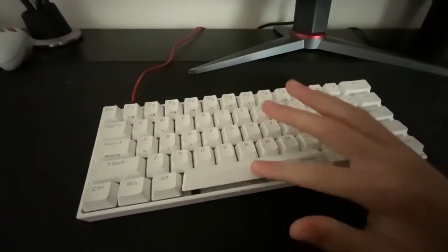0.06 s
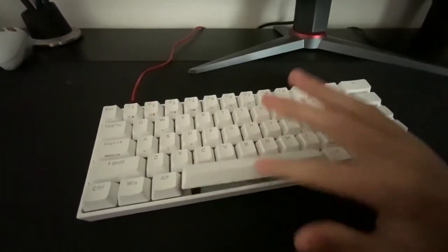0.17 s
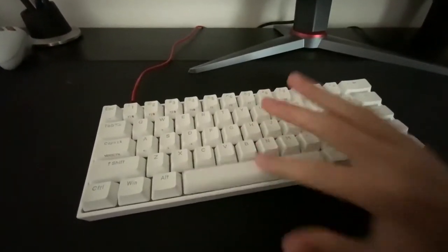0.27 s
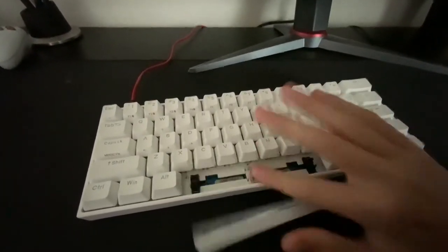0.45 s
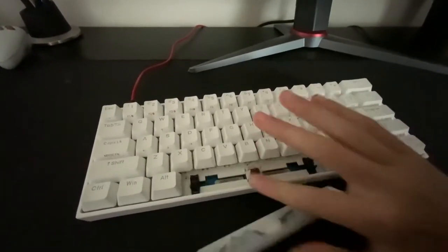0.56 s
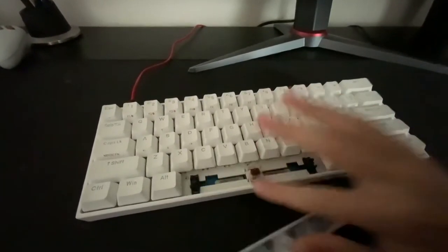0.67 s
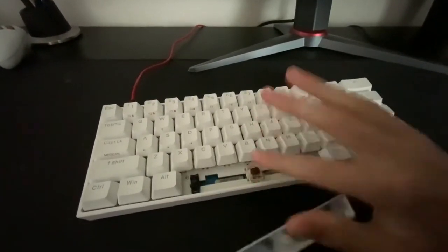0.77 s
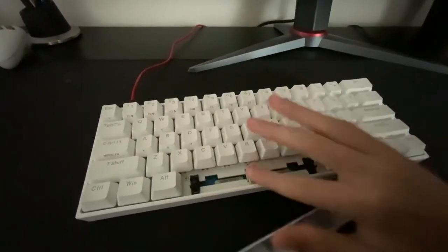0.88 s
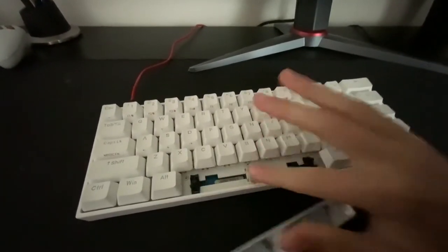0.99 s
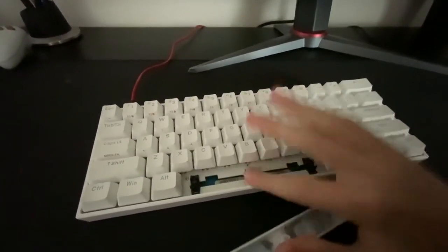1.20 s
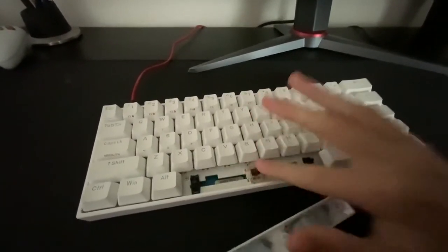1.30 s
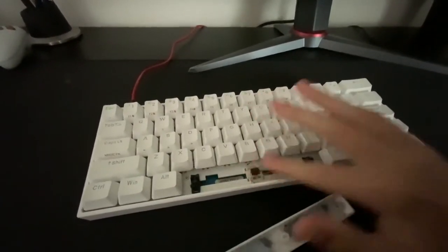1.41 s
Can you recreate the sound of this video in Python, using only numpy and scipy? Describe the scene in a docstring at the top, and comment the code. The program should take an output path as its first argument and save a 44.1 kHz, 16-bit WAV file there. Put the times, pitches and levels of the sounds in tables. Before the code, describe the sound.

A plastic space bar rattles and clatters off a keyboard, then the bare switch clicks.

```python
"""A plastic rattle: a space bar is worked loose on its stems, pops off and clatters on the desk.
Each contact is a brief cluster of plastic modes; the hollow bar rings, the desk knocks and hums.
A finger then taps the bare switch, which clicks going down and up, ringing its stem and the
mechanical keyboard's case. The desk thumps softly throughout. A small, quiet room."""
import sys
import numpy as np
from scipy import signal
from scipy.fft import rfft, irfft
from scipy.io import wavfile
from scipy.ndimage import uniform_filter1d

SR = 44100
rng = np.random.default_rng(int(sys.argv[2]) if len(sys.argv) > 2 else 0)


def transcribe(u):
    """Save the signal u as a 16-bit wav file named by the first command-line argument.

    u: samples, shape (n,) or (channels, n), limited to [-1, 1]; the rate is SR.
    q: integer samples, one column per channel.
    """
    v = np.clip(np.atleast_2d(u).T, -1, 1)
    q = np.round(v * 32767).astype(np.int16)
    wavfile.write(sys.argv[1], SR, q)


N = 63945
T = np.arange(N) / SR
HZ = np.maximum(np.fft.rfftfreq(2 * N, 1 / SR), 1)


def from_db(db):
    """Decibels to gain."""
    return 10 ** (np.asarray(db) / 20)


def at_hz(points, hz):
    """Read a table on a log-frequency axis."""
    f, value = np.transpose(points)
    return np.interp(np.log(hz), np.log(f), value)


def decay(t, t60):
    """Exponential fall, 60 dB in t60 seconds."""
    return np.exp(-np.log(1000) * t / t60)


def add(out, s, sound):
    """Mix a sound in at time s."""
    i = max(int(s * SR), 0)
    out[..., i:i + sound.shape[-1]] += sound[..., :N - i]


def pan(x, pan_db):
    """Set left pan_db above right."""
    return x * from_db([[pan_db / 2], [-pan_db / 2]])


def causal(gain):
    """Minimum-phase response with the given gains."""
    cepstrum = irfft(np.log(gain + 1e-9))
    half = cepstrum.shape[-1] // 2
    fold = np.r_[1, np.full(half - 1, 2), 1, np.zeros(half - 1)]
    return np.exp(rfft(cepstrum * fold))


def ring(x, modes):
    """Damped resonators in parallel, driven by x."""
    out = 0
    for hz, db, t60 in modes:
        r, w = decay(1 / SR, t60), 2 * np.pi * hz / SR
        poles = [1, -2 * r * np.cos(w), r * r]
        out = out + signal.lfilter([0, from_db(db) * np.sin(w)], poles, x + 1e-18)
    return out


def struck(blows, modes, vary_db, detune, rise_cycles=1.36, size=8192):
    """Each blow (time [s], level [dB]) rings every mode with its own strength and tuning."""
    out, t = np.zeros(N), T[:size]
    for s, db in blows:
        for hz, mode_db, t60 in modes:
            strength, tuning, phase = rng.standard_normal(3)
            envelope = (1 - np.exp(-t * hz / rise_cycles)) * decay(t, t60)
            tone = np.sin(2 * np.pi * (hz * (1 + detune * tuning) * t + phase))
            add(out, s, from_db(db + mode_db + vary_db * strength) * envelope * tone)
    return out


def contacts(rows, colour, spread, attack_s, peak_db, peak_width, size=4096):
    """Each contact sets off a dense cluster of plastic modes that dies in milliseconds."""
    bass_hz, treble_hz, mono_below_hz = 1070, 4940, 97
    bend_lag_s, bend_hz = 0.001411, 2002  # slow bending waves: lows arrive late
    out, t = np.zeros((2, N)), T[:size]
    hz = np.maximum(np.fft.rfftfreq(size, 1 / SR), 1)
    body = from_db(at_hz(colour, hz))
    body /= np.sqrt(np.mean(body ** 2))
    late_lows = np.exp(-2j * np.pi * bend_lag_s * bend_hz * np.arctan(hz / bend_hz))
    for s, db, bass_db, treble_db, t60, *peaks in rows:
        envelope = (1 - np.exp(-t / attack_s)) * decay(t, t60)
        mid, side = rfft(rng.standard_normal((2, size)) * envelope)
        burst = mid + spread * side * [[1], [-1]] / (1 + (mono_below_hz / hz) ** 2)
        local_rms = np.sqrt(uniform_filter1d(abs(burst) ** 2, size=44))
        shape_db = bass_db / (1 + (hz / bass_hz) ** 4) + treble_db / (1 + (treble_hz / hz) ** 4)
        for peak_hz in peaks:
            shape_db += peak_db * np.exp(-(np.log(hz / peak_hz) / peak_width) ** 2)
        contact = irfft(burst * late_lows * causal(body * from_db(shape_db) / local_rms))
        add(out, s, from_db(db) * np.sqrt(SR / 100) * contact)  # level referred to 10 ms
    return out


# Left-right likeness of diffuse sound: (frequency [Hz], coherence [0-1])
COHERENCE = [(120, 1), (300, 1), (600, 0), (1500, 0), (4000, 0), (12000, 1)]


def diffuse(colour):
    """Coloured stereo noise, rms 1; the sides are alike in the bass and at the top, apart between."""
    mid, side = rfft(rng.standard_normal((2, 2 * N))) * from_db(at_hz(colour, HZ))
    alike = at_hz(COHERENCE, HZ)
    x = irfft(np.sqrt(1 + alike) * mid + np.sqrt(1 - alike) * side * [[1], [-1]])[:, :N]
    return x / x.std()


# Background spectrum: (frequency [Hz], relative density [dB])
ROOM_TONE_COLOUR = [(25, -33), (50, -1), (80, 3), (120, -3.5), (175, -9.5), (235, -5.5), (285, -1.5),
                    (335, -12.5), (450, -5.5), (560, -12), (700, -22), (1300, -18), (2500, -30),
                    (4500, -39.5), (8000, -36), (10000, -52.5), (12500, -43.5), (16000, -55)]


def room_tone(level_db=-48):
    """Steady, low background noise."""
    return from_db(level_db) * diffuse(ROOM_TONE_COLOUR)


# Reflection spectrum: (frequency [Hz], relative gain [dB])
REVERB_COLOUR = [(60, -11.5), (140, 18.5), (300, -3), (600, 6), (1500, 4.5), (4000, 3), (8000, -1.5),
                 (10000, -13), (12500, -0.5), (15000, -4)]


def reverb(x, build_s=0.002):
    """Quick reflections from desk, screen and wall, then a longer tail."""
    response = 0
    for db, t60_s in ((-15.5, 0.099), (-17, 0.39)):
        fade = (1 - np.exp(-(T / build_s) ** 2)) * decay(T, t60_s)
        fade /= np.sqrt(np.sum(fade ** 2))
        response = response + from_db(db) * diffuse(REVERB_COLOUR) * fade
    return signal.fftconvolve(x, response, axes=1)[:, :N]


# Desk thumps: (time [s], level [dB], frequency [Hz], swell [s])
THUMPS = [(0.033, -39.5, 76.6, 0.023), (.231, -27.5, 74.7, 0.013), (.406, -18, 63.4, 0.0073),
          (.468, -37, 60.6, 0.02), (.673, -32, 76.2, 0.013), (.851, -31.5, 84.2, 0.0072),
          (1.019, -34.5, 92.6, 0.0089), (1.186, -41.5, 79, .02), (1.343, -47.5, 81.7, 0.017)]


def desk_thumps():
    """Each press rocks the desk for a few slow cycles."""
    out = np.zeros(N)
    for s, db, hz, swell_s in THUMPS:
        envelope = (T / swell_s * np.exp(1 - T / swell_s)) ** 2
        add(out, s, -from_db(db) * envelope * np.sin(2 * np.pi * hz * T))
    return out


# Bar ends hitting the desk: (time [s], level [dB], band centre [Hz])
KNOCKS = [(0.39, 3, 1490), (0.392, 6, 647)]
# Desk top, short modes and low hum: (frequency [Hz], gain [dB], t60 [s])
DESK_MODES = [(560, -14.5, 0.047), (649, -16, 0.032), (910, -27, 0.0066), (1010, -8, 0.011),
              (1470, -5.5, 0.0077), (1820, -23, 0.013)]
DESK_HUM_MODES = [(122.4, -39, 1), (205.8, -36, 0.39), (292.6, -34.5, 0.25), (381, -34, 0.31),
                  (430, -21.5, 0.061), (463, -37, .28)]


def desk_knock(band_ratio=1.38, low_cut_hz=410, landing_s=0.411):
    """The falling bar strikes the desk twice, bright then hollow, and leaves it humming as it lands."""
    force, landing = np.zeros((2, N))
    for s, db, hz in KNOCKS:
        band = signal.butter(2, [hz / band_ratio, hz * band_ratio], "band", fs=SR, output="sos")
        add(force, s, from_db(db) * signal.sosfilt(band, signal.unit_impulse(N)))
    low_cut = signal.butter(3, low_cut_hz, "high", fs=SR, output="sos")
    knock = signal.sosfilt(low_cut, ring(force, DESK_MODES))
    add(landing, landing_s, np.ones(1))
    return pan(knock, pan_db=0.5) - ring(landing, DESK_HUM_MODES)


# Light taps: (time [s], level [dB], bass [dB], treble [dB], t60 [s], resonance [Hz])
TAPS = [(.5945, -49, 5, -20, 0.011, 1000), (.6525, -53.5, -3, 2.5, 0.0081, 1620),
        (.6595, -47, 4, -12, 0.0069, 1550), (.671, -46, 3, -14, 0.029, 3670),
        (.988, -39.5, -22, -24, 0.043, 3350), (1.1595, -40.5, -22, 6, 0.028, 3320),
        (1.169, -53.5, -4, 5, .019, 2330), (1.332, -39.5, -44, -11, .022, 2500),
        (1.371, -44, 5.5, -4, .04, 1660)]
# Tap spectrum: (frequency [Hz], relative density [dB])
TAP_COLOUR = [(200, -39), (600, -26), (900, 2.5), (1300, 9.5), (1750, 1), (2500, 3.5), (3400, -5),
              (4500, -5), (7000, -8), (12500, -29), (16000, -21)]


def light_taps():
    """Fingers and loose plastic touch lightly."""
    taps = contacts(TAPS, TAP_COLOUR, spread=0.8, attack_s=0.00035, peak_db=8, peak_width=0.15)
    return pan(taps, pan_db=0.8)


# Switch clicks: (time [s], level [dB], bass [dB], treble [dB], t60 [s], resonance 1 [Hz],
# resonance 2 [Hz], case ring [dB], stem ring [dB])
CLICKS = [(0.7251, -39.5, 10, -14, 0.04, 3370, 1300, -42, -55.5),
          (0.8363, -27.5, -1, 2, 0.0085, 8040, 2840, -35, -41.5),
          (.9130, -19.5, 1, -1, 0.0078, 11750, 4650, -37, -25),
          (1.009, -40.5, 10.5, 6.5, 0.0059, 7050, 8650, -48, -51),
          (1.0885, -30, -10, -3, 0.01, 6070, 8900, -42.5, -49),
          (1.2452, -32, -16, 1.5, 0.014, 6450, 3000, -43.5, -56),
          (1.327, -46.5, -13, 1.5, .011, 7800, 3030, -70, -47),
          (1.3896, -43.5, 8, -3, 0.0036, 5000, 3970, -45.5, -52.5)]
# Click spectrum: (frequency [Hz], relative density [dB])
CLICK_COLOUR = [(200, -20), (600, -15), (900, -9.5), (1400, -5), (1850, 2), (2700, 1), (3200, -2),
                (3750, 1), (5300, -0.5), (7100, 3), (8200, 5), (9200, -9), (11600, -4.5), (13500, 0),
                (16000, -13)]
# Modes of the case, and of the stem and spring: (frequency [Hz], gain [dB], t60 [s])
CASE_MODES = [(487, -24, 0.027), (619, -3.5, 0.079), (899, -3, 0.074), (1147, -4.5, 0.081)]
STEM_MODES = [(1720, 6, 0.02), (2115, 5, 0.039), (2630, 8, 0.013), (2970, 4, 0.021), (3615, 8.5, 0.016),
              (4390, -4.5, .055), (4600, 1.5, 0.022), (6140, -3, 0.02)]


def switch():
    """The bare switch snaps, ringing the case and the stem differently each time."""
    clicks = contacts([row[:-2] for row in CLICKS], CLICK_COLOUR,
                      spread=0.37, attack_s=0.00038, peak_db=6.5, peak_width=0.08)
    case_blows = [(s, case_db) for s, *_, case_db, stem_db in CLICKS]
    stem_blows = [(s, stem_db) for s, *_, stem_db in CLICKS]
    case = struck(case_blows, CASE_MODES, vary_db=3, detune=0.031)
    stem = struck(stem_blows, STEM_MODES, vary_db=3.3, detune=0.0037)
    return pan(clicks + case + stem, pan_db=0.8)


# Scrape envelope: (time [s], level [dB])
SCRAPE_LEVEL = [(0, -60.5), (.14, -51), (.18, -44), (.225, -45), (.27, -43), (.31, -42), (.37, -62),
                (.378, -31.5), (.385, -61), (.4, -80.5)]
# Bar-on-stem spectrum, scrape and rattle: (frequency [Hz], relative density [dB])
RATTLE_COLOUR = [(150, -43), (380, -12.5), (630, 2.5), (880, -9), (1230, 0), (2000, -2), (2850, -2.5),
                 (4000, -11), (6000, -15.5), (8000, -13.5), (10000, -26), (12500, -21), (16000, -36)]


def scrape(slips_per_s=960):
    """Tiny slips of plastic on plastic between the rattles."""
    slips = (rng.random(N) < slips_per_s / SR) * rng.standard_normal(N)
    response = causal(from_db(at_hz(RATTLE_COLOUR, HZ)))
    friction = irfft(rfft(slips, 2 * N) * response)[:N]
    level_db = np.interp(T, *np.transpose(SCRAPE_LEVEL))
    return friction / friction.std() * from_db(level_db)


# Bar contacts, on the stems then on the desk:
# (time [s], level [dB], bass [dB], treble [dB], t60 [s], resonance 1 [Hz], resonance 2 [Hz])
RATTLES = [(.0205, -39.5, 0, 2.5, 0.023, 2800, 1310), (.0325, -42.5, 9, -5, 0.015, 1290, 2000),
           (.077, -37, 4, -2, .075, 1300, 2840), (.122, -39, -4, 7, 0.0097, 3480, 2120),
           (.1555, -44.5, 5, 17.5, 0.025, 4550, 3340), (.164, -37.5, 2, 7, 0.023, 1220, 3300),
           (.174, -39, 3, -5, 0.0093, 1174, 4300), (.1875, -34, -3.5, 5, 0.013, 3300, 7540),
           (.1925, -31, 1.5, 10.5, 0.016, 733, 2750), (.2095, -32, 2.5, 13, 0.043, 3270, 7200),
           (.2205, -31.5, 5, 12, 0.017, 1310, 3050), (.246, -27, -10.5, -18, 0.0091, 1260, 2940),
           (.2505, -30, -1, 1, 0.0068, 1230, 3530), (.2612, -19, -5.5, 3, 0.012, 2760, 1730),
           (.269, -33.5, -6.5, -22.5, .025, 2450, 854), (.285, -33, 6.5, 10.5, 0.036, 641, 6230),
           (.2935, -42.5, 2, 13, .014, 1706, 610), (.2972, -26, -4.5, 8.5, 0.011, 2150, 4600),
           (.315, -33, -18, -7, 0.025, 3360, 4440), (.337, -37, -4.5, -4.5, .02, 1730, 3360)]
CLATTER = [(.3815, -27, -4.5, 8.5, .012, 3100, 11850), (.3905, -25, -1, -18, 0.0037, 3530, 4200),
           (.4059, -19.5, -12, 5.5, 0.0084, 5990, 3470), (.4078, -24, 7, 1, 0.02, 4400, 3510),
           (.411, -27, 5, -1, 0.026, 3390, 246), (.419, -25, -13, -26.5, 0.065, 3500, 2280),
           (.429, -37, 4, 1.5, 0.06, 430, 5340), (.4482, -33, 12, -14.5, 0.072, 1400, 638),
           (.458, -40, 10.5, 7.5, 0.047, 630, 3470), (.532, -50.5, -6, -4, 0.031, 2070, 3350)]
# Clatter spectrum: (frequency [Hz], relative density [dB])
CLATTER_COLOUR = [(120, -3.5), (350, 6), (600, 3), (950, 1), (1700, 10.5), (2600, 5), (3700, 2.5),
                  (6200, -1), (8000, 1.5), (12500, -13), (16000, -19.5)]
# Hollow bar modes: (frequency [Hz], gain [dB], t60 [s])
BAR_MODES = [(635, -41, 0.21), (1207, -25.5, 0.032), (1675, -43.5, .08), (2560, -28, 0.036),
             (3570, -36.5, 0.076), (4480, -37.5, 0.053)]


def space_bar():
    """The bar rattles, springs off and clatters, ringing as a hollow shell."""
    rattle = contacts(RATTLES, RATTLE_COLOUR,
                      spread=0.41, attack_s=0.00041, peak_db=7.5, peak_width=0.061)
    rattle += scrape()
    clatter = contacts(CLATTER, CLATTER_COLOUR,
                       spread=0.27, attack_s=0.00077, peak_db=8, peak_width=0.065)
    shell = ring(rattle + from_db(-16) * clatter, BAR_MODES)
    return pan(rattle + from_db(-14.5) * shell, pan_db=1.3) + pan(clatter, pan_db=0.8)


def scene():
    """Keyboard and desk in the room, over its background."""
    direct = space_bar() + switch() + light_taps() + desk_knock() + desk_thumps()
    return direct + reverb(direct) + room_tone()


# Left microphone port behind the right: (frequency [Hz], phase lag [rad])
PORT_LAG = [(150, 0), (500, .25), (1000, .3), (1400, .6), (1750, 1.5), (2400, 3.9), (3100, 5.3),
            (4200, 7.0), (5200, 7.05), (8000, 8.9), (9600, 9.6), (14200, 12.5)]


def record(dry, low_cut_hz=32, high_cut_hz=16500):
    """The left port lags the right; the lowest bass and the top are cut."""
    left = irfft(rfft(dry[0], 2 * N) * np.exp(-1j * at_hz(PORT_LAG, HZ)))[:N]
    low_cut = signal.butter(2, low_cut_hz, "high", fs=SR, output="sos")
    high_cut = signal.ellip(10, 0.2, 80, high_cut_hz, fs=SR, output="sos")
    return signal.sosfilt(high_cut, signal.sosfilt(low_cut, [left, dry[1]]))


dry = scene()
out = record(dry)
transcribe(out)
```